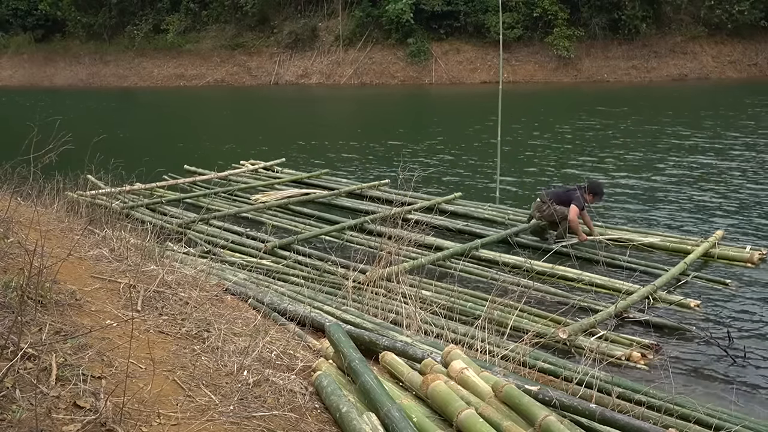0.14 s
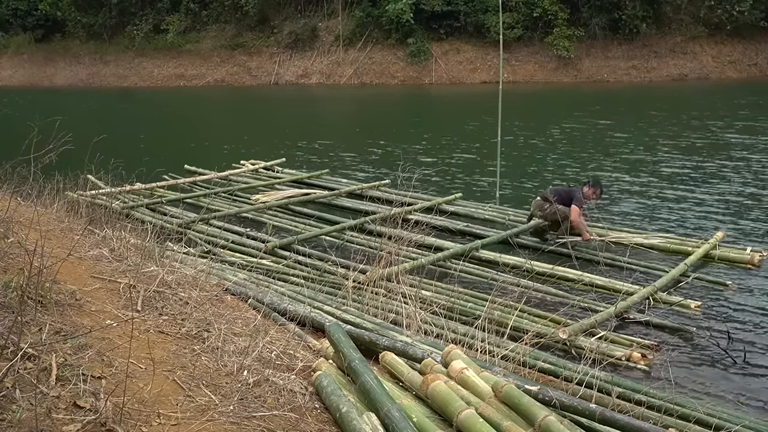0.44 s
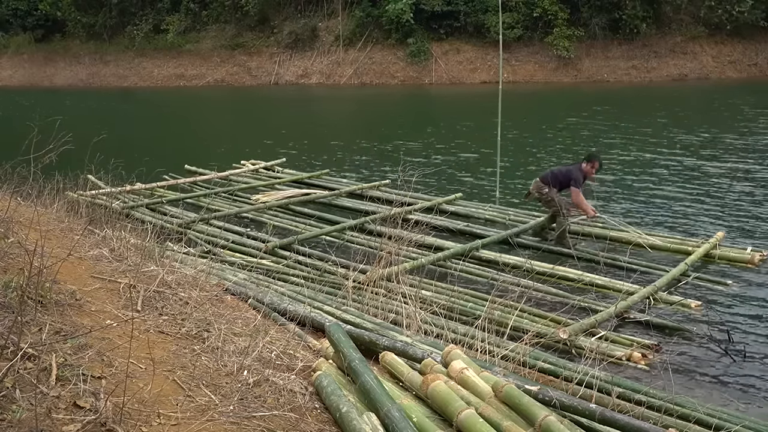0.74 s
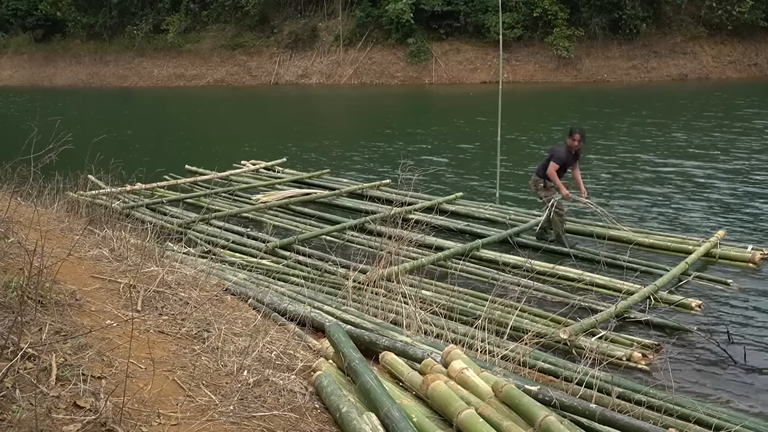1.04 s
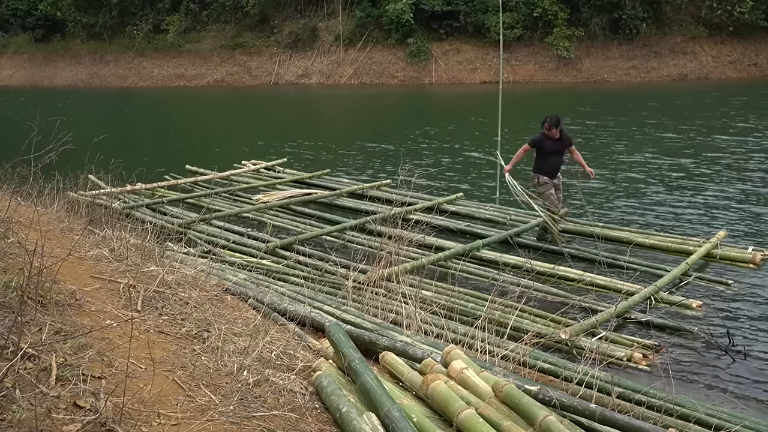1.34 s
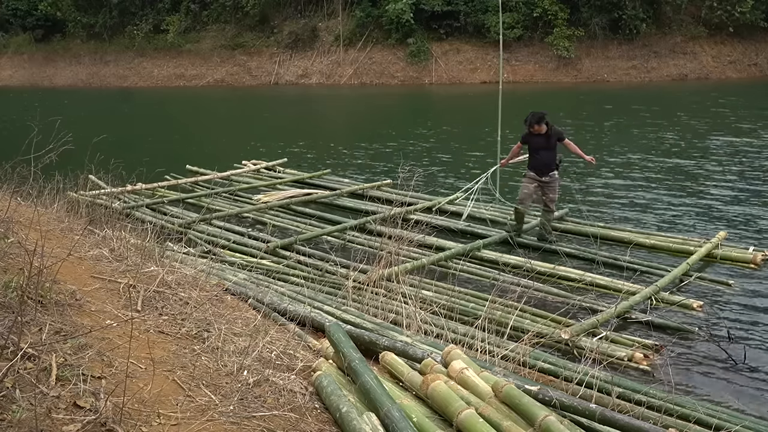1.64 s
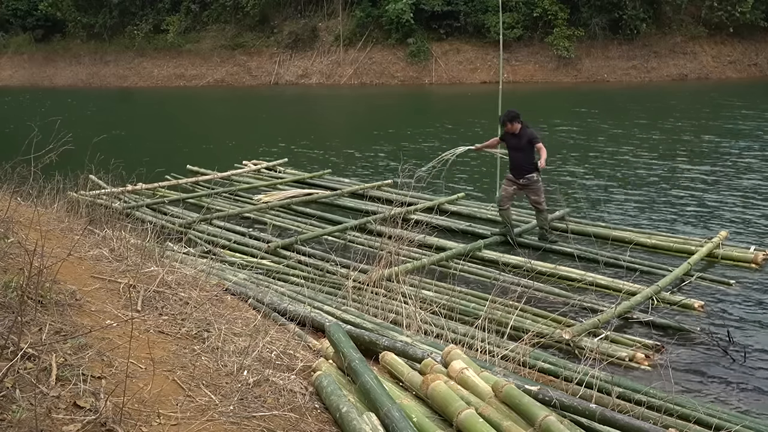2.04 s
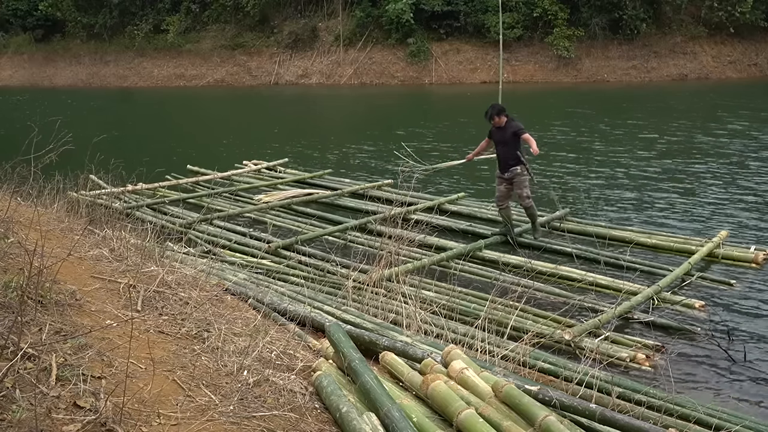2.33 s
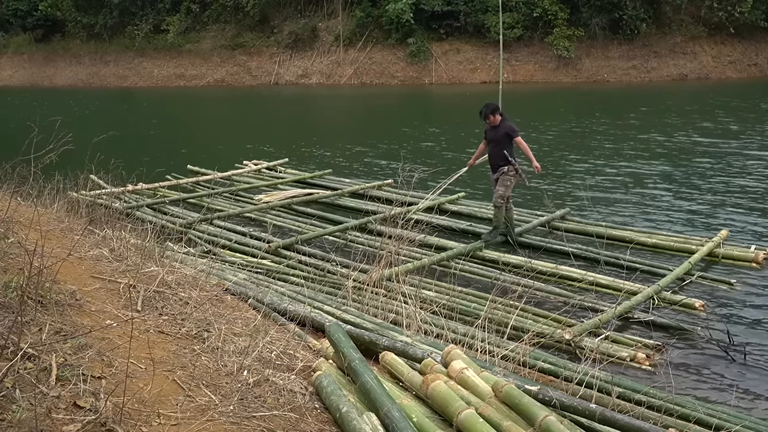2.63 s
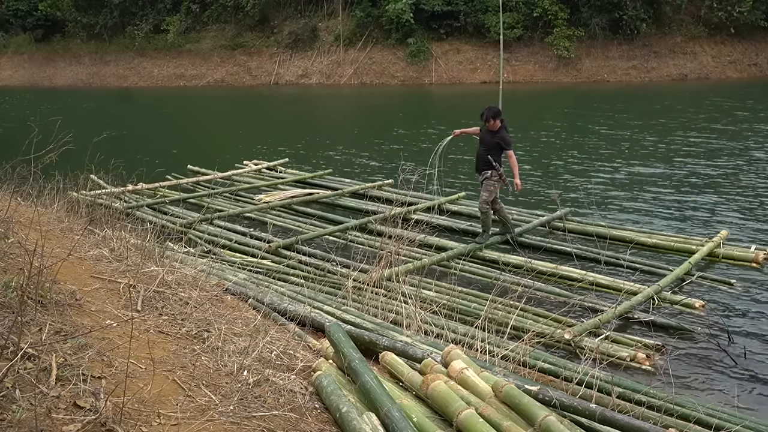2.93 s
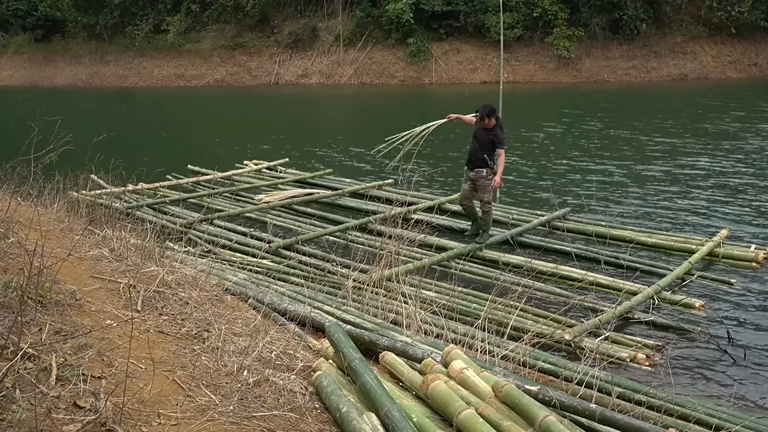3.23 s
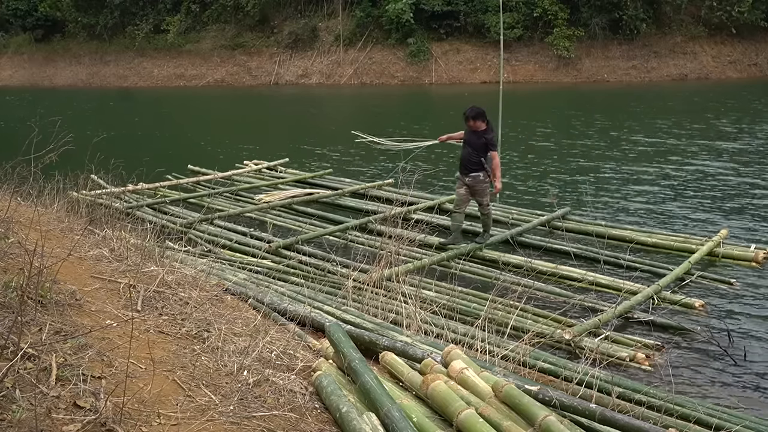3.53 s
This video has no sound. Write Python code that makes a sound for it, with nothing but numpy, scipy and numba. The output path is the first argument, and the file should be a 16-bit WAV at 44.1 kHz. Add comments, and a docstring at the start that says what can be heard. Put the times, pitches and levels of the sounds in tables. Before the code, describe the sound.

Footsteps on a floating bamboo raft, heard from a lake bank. Soft water hiss, fine crackle and low wind start at once, with light strip ticks. From about 0.4 s, short hollow knocks, creaks, scrapes and dull thuds come irregularly to the end, sharper near 1.5, 2.4 and 3.2 s. A dry crack snaps at 2.0 s. Wind booms on the microphone around 1.05 and 1.7-2.4 s, easing after 2.9 s.

```python
"""Wind rumble (slow noise), water hiss and fine crackle (noise bands) run from the start. Soon thin strips tick
(short noise bursts); then someone steps across a floating bamboo raft and each scuff swells with creaks,
thuds, scrapes and swish (many tiny contacts), as hollow poles knock (fading tones and rattle).
Gusts rumble on the microphone of a camera on the bank; its gain control turns all sound down when it is loud."""
import sys
import numpy as np
from scipy import signal
from scipy.io import wavfile
from scipy.ndimage import uniform_filter1d
from numba import njit

SR = 44100
rng = np.random.default_rng(int(sys.argv[2]) if len(sys.argv) > 2 else 0)


def inscribe(sig):
    """Save sig as 16-bit PCM at rate SR to the path in sys.argv[1].

    A 1-D sig is mono; a 2-D sig holds one channel per row.
    Samples are clipped to [-1, 1] before scaling.
    """
    pcm = np.round(np.clip(np.atleast_2d(sig).T, -1, 1) * 32767)
    wavfile.write(sys.argv[1], SR, pcm.astype(np.int16))


N = 163170  # length in samples

# Gusts. Each row: moment in seconds, level in dB, upper rumble in dB relative to the low rumble.
GUSTS = [(0, -26, 9.5), (.06, -46, -4), (.11, -24, -6), (.29, -15.5, -24), (.58, -16, -8),
         (.77, -16.5, -18.5), (.91, -22, -9), (1.05, -5.5, -14), (1.12, -15.5, -11.5), (1.36, -22, -4),
         (1.47, -16.5, -14.5), (1.52, -29.5, -45), (1.64, -22.5, 1.5), (1.74, -5.5, -7.5), (2.0, -7, -8.5),
         (2.3, -7.5, -10.5), (2.44, -20, -5.5), (2.59, -9.5, -9), (2.78, -11, -7), (2.95, -26.5, -30),
         (3.15, -32.5, -21), (3.26, -16.5, -14.5), (3.47, -31, -25), (3.7, -38.5, 5)]
# Low wind rumble. Each row: centre in Hz, width in Hz, level in dB.
LOW_RUMBLE = [(27.9, 21, -0.5), (43.4, 18.4, 2), (67.9, 32.8, -2.5)]
# Upper wind rumble. Each row: centre in Hz, width in Hz, level in dB.
HIGH_RUMBLE = [(102, 51, 2.5), (152, 76, -3), (232.6, 115, -14)]
# Water hiss. Each row: frequency in Hz, level in dB per Hz.
WATER_HISS = [(150, -39), (510, -3.5), (890, 2), (1420, -7), (3650, -5), (5350, -16.5), (8260, -31),
              (13200, -36), (16000, -61)]
# Cracks of thin strips. Each row: start in seconds, approximate peak in dB, centre in Hz,
# top end in dB relative to the main band, time to fade by 60 dB in seconds.
STRIP_TICKS = [(0.0488, -20, 2630, -13.5, 0.021), (0.1075, -25, 4360, -16, 0.017),
               (0.2883, -30, 4470, -24, 0.03), (0.425, -22.5, 3370, -3, 0.015),
               (0.4708, -33, 3500, 1, 0.014), (0.5464, -15, 2550, -35, 0.012),
               (0.6714, -23, 3450, -0.5, 0.025), (0.7309, -25, 3230, -19, 0.14),
               (0.8297, -26, 5000, -5, 0.012), (0.853, -12, 3030, -20, 0.072),
               (0.979, -29.5, 5670, 0, 0.032), (1.1638, -22, 3320, -27, 0.032),
               (1.2392, -28.5, 4760, -1, 0.027), (1.293, -24.5, 4800, -6.5, 0.1),
               (1.473, -11.5, 3650, -2, 0.019), (1.7043, -18.5, 4440, -9, 0.013),
               (1.714, -20.5, 4900, -8, 0.021), (1.914, -16, 3600, -8.5, 0.055),
               (1.96, -22.5, 5460, -14, 0.022), (2.0016, -5, 3000, -32, 0.017),
               (2.116, -16.5, 3160, -16, 0.022), (2.4683, -27, 3510, -5, 0.014),
               (2.5102, -17, 3330, -23, 0.023), (2.6332, -25.5, 3520, -12, 0.042),
               (2.9275, -21.5, 3400, -19.5, 0.053), (3.0633, -12, 1900, -41, 0.029),
               (3.172, -23, 5300, -10, 0.023), (3.2767, -17, 3600, -25, 0.012)]
# Scuffs of feet and strips. Each row: start in seconds, length in seconds,
# then the levels of creaks, thuds, scrape and swish in dB.
SCUFFS = [(0.384, 0.23, -27, -68, -32.5, -53), (0.54, 0.21, -32, -41, -33.5, -55),
          (0.679, 0.14, -46, -58, -34.5, -46), (0.948, 0.14, -31, -51, -38, -49.5),
          (1.142, 0.084, -50, -39, -33.5, -46), (1.226, 0.093, -40, -37.5, -39, -46.5),
          (1.31, 0.1, -37, -49, -34, -48.5), (1.42, .12, -32.5, -59, -28.5, -42),
          (1.63, 0.11, -31.5, -32, -32.5, -56), (1.812, 0.045, -31, -36, -37, -76),
          (2.196, 0.089, -27.5, -30.5, -37.5, -82), (2.361, 0.22, -29, -74, -35, -57),
          (2.565, 0.17, -46, -46, -36, -53), (2.719, 0.042, -26.5, -46, -50, -71),
          (2.785, 0.14, -31.5, -37.5, -35.5, -54), (3.057, 0.099, -34, -28, -37.5, -85),
          (3.13, 0.2, -27.5, -34, -37, -67), (3.391, 0.072, -30, -31.5, -41, -65),
          (3.59, 0.056, -39, -30, -40.5, -63), (3.634, 0.051, -45, -35.5, -31, -50.5)]
# Ways the whole raft rings. Each row: pitch in Hz, level in dB, time to fade by 60 dB in seconds.
RAFT_MODES = [(654, -7, 0.058), (809.5, -6, 0.1), (898.7, 2, 0.064), (1070, -1, 0.017), (1224, -0.5, 0.024),
              (1590, -3.5, 0.016)]
# Colour of scraping. Each row: centre in Hz, width in Hz, level in dB.
SCRAPE_BANDS = [(2030, 1960, 13), (3286, 550, 6.5), (4990, 1370, 7)]
# Colour of the thin swish. Each row: centre in Hz, width in Hz, level in dB.
SWISH_BANDS = [(11100, 3000, 1), (12900, 4600, -2.5)]
# Knocks on the poles. Each row: start in seconds, approximate peak in dB, pitch in Hz,
# ring time to fade by 60 dB in seconds.
POLE_KNOCKS = [(0.425, -22.5, 900, 0.042), (0.47, -18.5, 964, 0.03), (0.554, -13, 791, 0.057),
               (0.597, -21.5, 715, 0.038), (0.622, -16.5, 1525, 0.021), (0.703, -14.5, 748, 0.038),
               (0.732, -15, 905, 0.033), (0.852, -21, 810, 0.024), (1.014, -23, 1090, 0.031),
               (1.047, -12.5, 1130, 0.018), (1.108, -24, 880, 0.067), (1.25, -25.5, 530, 0.056),
               (1.333, -14.5, 1010, 0.011), (1.44, -22.5, 856, 0.25), (1.464, -4.5, 1000, 0.0082),
               (1.664, -16.5, 800, 0.013), (1.811, -21.5, 1100, 0.034), (1.842, -14.5, 890, 0.027),
               (2.053, -22.5, 760, 0.032), (2.218, -19, 580, 0.033), (2.385, -22, 1770, 0.02),
               (2.405, -9.5, 1098, 0.032), (2.471, -15, 1628, 0.032), (2.57, -20.5, 984, 0.025),
               (2.73, -20.5, 519, 0.051), (2.814, -13, 885, 0.041), (2.886, -17.5, 920, 0.046),
               (3.148, -25.5, 909, 0.067), (3.188, -16.5, 1754, 0.022), (3.241, -5, 1045, 0.014),
               (3.379, -14.5, 660, 0.041), (3.422, -20, 930, 0.016), (3.595, -25, 633, 0.042)]
# Tones of one hollow pole. Each row: multiple of its pitch, level in dB, share of its ring time.
POLE_TONES = [(1.004, 3, 1.33), (1.27, -10, 0.5), (1.9, -29, 0.16)]

BUFFET_DB, BUFFETS_PER_S, SHARED_BUFFET_DB = 1, 11, 2
SURGE_DB_PER_OCTAVE, SURGES_PER_S = 2.5, 26
LEFT_WIND_DB = 0.35  # wind on the left compared with the right
OPPOSITE_TREBLE_NOISE_DB = -82
LAKE_DB, FLICKER_DB, FLICKERS_PER_S = -36.5, 3, 9.55
CRACKLE_DB, CRACKLES_PER_S, CRACKLE_SCATTER_DB = -58, 100, 8.5
TICK_CREST_DB = 4.5  # allowance for a crack's peak above its average (rms) level
TICK_TOP_HZ, TICK_TOP_WIDTH_HZ = 11000, 9000
GRAIN_S, GRAIN_TOP_DB = 0.002, 8  # time for a grain's power to fall to 37 %; cap on the size boost
CREAKS_PER_S, CREAK_SCATTER_DB = 48, 5.5  # rate for each mode of the raft; thuds share the scatter
THUD_HZ, THUD_WIDTH_HZ, THUDS_PER_S = 342, 430, 440
SCRAPES_PER_S, SCRAPE_SCATTER_DB = 300, 3.5
SWISHES_PER_S, SWISH_SCATTER_DB = 93, 21
SCUFF_RISE = 0.41  # share of a scuff's length
CONTACT_S = 0.0012  # time for a pole's ring to rise
BLOW_T60_S = 0.069  # fade of the shake that each knock gives the raft
RAFT_DB, RATTLE_DB, RATTLE_SHARE = -10.5, -3, 1.73  # share: rattle fade over ring fade
KNEE_DB, RATIO, ATTACK_S, RELEASE_S = -16, 1.99, 0.037, 0.13
CEILING = 0.71  # full scale is 1
TOP_HZ = 16400


def undb(db):
    """Turn decibels into a plain factor."""
    return 10 ** (np.asarray(db) / 20)


def unit(x):
    """Scale a sound to an average (rms) level of 1."""
    return x / np.sqrt(np.mean(x ** 2))


def curve(table, col):
    """Draw straight lines through one column over time."""
    rows = np.array(table)
    return np.interp(np.arange(N) / SR, rows[:, 0], rows[:, col])


def band(x, hz, width, order=1):
    """Resonance with gain 1 at the centre; each extra pass makes it steeper."""
    sharpness = max(hz / width, 1 / 4)
    b, a = signal.iirpeak(min(hz, SR * 4 / 10), sharpness, fs=SR)
    for _ in range(order):
        x = signal.lfilter(b, a, x)
    return x


def noise_band(length, hz, width, order=2):
    """Fresh noise narrowed to one band, at average level 1."""
    return unit(band(rng.standard_normal(length), hz, width, order=order))


def bank(x, table, order=1):
    """Mix several bands of one sound at their listed levels."""
    return sum(undb(db) * unit(band(x, hz, width, order=order)) for hz, width, db in table)


def walk(rate):
    """Random levels held for 1 / rate seconds and smoothed twice; spread near 1."""
    hold = int(SR / rate)
    steps = rng.standard_normal(N // 256)[np.arange(N) // hold]
    smoother = uniform_filter1d(steps, hold)
    return unit(uniform_filter1d(smoother, hold))


def grains(rate, scatter_db):
    """Brief bursts of noise at random moments, some larger than others."""
    chance, luck = rng.random((N, 2)).T
    boost_db = np.minimum(-scatter_db * np.log(1 - luck), GRAIN_TOP_DB)
    starts = (chance < rate / SR) * undb(2 * boost_db)  # twice the dB, as this is power
    keep = np.exp(-1 / (GRAIN_S * SR))
    power = signal.lfilter([1], [1, -keep], starts)
    return np.sqrt(power) * rng.standard_normal(N)


def fade(t, t60):
    """Die away by 60 dB in t60 seconds, or in 2 ms if t60 is shorter."""
    return np.exp(-np.log(1000) * t / max(t60, 1 / 500))


def tone(t, hz, t60):
    """One ringing pitch that dies away."""
    return np.sin(2 * np.pi * hz * t) * fade(t, t60)


def add(out, s, x):
    """Mix a sound in at s seconds."""
    i = int(s * SR)
    out[i:i + len(x)] += x[:N - i]


def wind():
    """Buffeting low noise whose level comes in lumps; higher bands of the upper rumble swing more."""
    buffet = walk(BUFFETS_PER_S)
    low = 0
    for hz, width, db in LOW_RUMBLE:
        level_db = db + BUFFET_DB * walk(BUFFETS_PER_S)
        low = low + undb(level_db) * noise_band(N, hz, width)
    high = 0
    for hz, width, db in HIGH_RUMBLE:
        octaves = np.log2(hz / LOW_RUMBLE[1][0])  # above the second low band
        surge_db = SURGE_DB_PER_OCTAVE * octaves * walk(SURGES_PER_S)
        level_db = db + surge_db + BUFFET_DB * buffet
        high = high + undb(level_db) * noise_band(N, hz, width, order=3)
    rumble = unit(low) + undb(curve(GUSTS, 2)) * unit(high)
    shared = unit(undb(SHARED_BUFFET_DB * buffet))
    return shared * undb(curve(GUSTS, 1)) * rumble


def lake():
    """Water hiss made of noise bands half an octave apart, each flickering by itself."""
    rows, hiss = np.array(WATER_HISS), 0
    for hz in 250 * 2 ** np.arange(0, 6.1, 0.5):
        per_hz_db = np.interp(np.log(hz), np.log(rows[:, 0]), rows[:, 1])
        # A higher band is wider, so it holds more sound.
        level_db = per_hz_db + 10 * np.log10(hz) + FLICKER_DB * walk(FLICKERS_PER_S)
        hiss = hiss + undb(level_db) * noise_band(N, hz, hz / 2)
    return undb(LAKE_DB) * unit(hiss)


def crackle():
    """A fine crackle that runs throughout: random grains kept to the treble."""
    contacts = grains(CRACKLES_PER_S, CRACKLE_SCATTER_DB)
    return undb(CRACKLE_DB) * unit(bank(contacts, SCRAPE_BANDS[2:] + SWISH_BANDS, order=2))


def opposite_treble_noise():
    """Faint treble noise, to be added on the left and subtracted on the right."""
    return undb(OPPOSITE_TREBLE_NOISE_DB) * noise_band(N, 16000, 12000)


def ticks():
    """Thin strips crack on the poles: noise in a main band and a top band that fade together."""
    out, t = np.zeros(N), np.arange(SR // 12) / SR
    for s, db, hz, top_db, t60 in STRIP_TICKS:
        body = noise_band(len(t), hz, 0.75 * hz)
        top = noise_band(len(t), TICK_TOP_HZ, TICK_TOP_WIDTH_HZ)
        crack = (body + undb(top_db) * top) * fade(t, t60)
        add(out, s, undb(db - TICK_CREST_DB) * crack)
    return out


def creaks():
    """Small contacts at random moments; each wakes one mode of the raft, so the clatter wanders in pitch."""
    t, out = np.arange(SR // 10) / SR, 0
    for hz, db, t60 in RAFT_MODES:
        contacts = grains(CREAKS_PER_S, CREAK_SCATTER_DB)
        out = out + undb(db) * signal.fftconvolve(contacts, tone(t, hz, t60))[:N]
    return out


def shuffle():
    """Each scuff is a swell of small contacts: creaks in the raft, dull thuds, scrapes and a thin swish."""
    thud = band(grains(THUDS_PER_S, CREAK_SCATTER_DB), THUD_HZ, THUD_WIDTH_HZ, order=3)
    rub = grains(SCRAPES_PER_S, SCRAPE_SCATTER_DB)
    scrape = bank(rub, SCRAPE_BANDS, order=2)
    strips = unit(rub) + unit(grains(SWISHES_PER_S, SWISH_SCATTER_DB))
    swish = bank(strips, SWISH_BANDS, order=2)
    layers = np.array([unit(x) for x in (creaks(), thud, scrape, swish)])
    t, power = np.arange(N) / SR, 0
    for s, length, *db in SCUFFS:
        moments = s + length * np.array([0, SCUFF_RISE, 1, 1.3])
        # The small end values carry on outside the swell, as a faint constant trace.
        swell = np.interp(t, moments, [0.0014, 1.0, 0.14, 0.0014])
        power = power + undb(db)[:, None] ** 2 * swell
    return np.sum(np.sqrt(power) * layers, axis=0)


def raft(x):
    """The lashed poles ring together when shaken."""
    t = np.arange(SR // 5) / SR
    ring = sum(undb(db) * tone(t, hz, t60) for hz, db, t60 in RAFT_MODES)
    return signal.fftconvolve(x, ring / np.max(ring))[:N]


def knocks():
    """Each blow rings one hollow pole at its own pitch, rattles briefly and shakes the raft."""
    out, blows, t = np.zeros(N), np.zeros(N), np.arange(SR // 6) / SR
    for s, db, hz, t60 in POLE_KNOCKS:
        pole = sum(undb(tone_db) * tone(t, multiple * hz, share * t60)
                   for multiple, tone_db, share in POLE_TONES)
        pole = pole * np.minimum(t / CONTACT_S, 1)
        rattle = noise_band(len(t), 1.01 * hz, 0.39 * hz) * fade(t, RATTLE_SHARE * t60)
        shake = fade(t, BLOW_T60_S) * rng.standard_normal(len(t)) / 6
        add(out, s, undb(db) * (pole + undb(RATTLE_DB) * rattle))
        add(blows, s, undb(db) * shake)
    return out + undb(RAFT_DB) * raft(blows)


def scene():
    """Mix everything into left and right; only the wind balance and the opposite treble noise differ."""
    air = wind()
    rest = lake() + crackle() + ticks() + shuffle() + knocks()
    side = (undb(LEFT_WIND_DB / 2) - 1) * air + opposite_treble_noise()
    return np.array([air + rest + side, air + rest - side])


@njit
def follow(x, up, down):
    """Track loudness with a quick rise and a slower fall."""
    e, out = 0., np.empty(len(x))
    for i in range(len(x)):
        e += (x[i] - e) * (up if x[i] > e else down)
        out[i] = e
    return out


def record(dry):
    """Gain control ducks loud passages, a soft ceiling rounds peaks, and the top is cut."""
    loudness = follow(np.abs(dry).max(axis=0), 1 / (ATTACK_S * SR), 1 / (RELEASE_S * SR))
    below_knee = np.minimum(undb(KNEE_DB) / (loudness + 1e-9), 1)
    x = dry * below_knee ** (1 - 1 / max(RATIO, 1))
    x = x / (1 + np.abs(x / CEILING) ** 6) ** (1 / 6)
    top_cut = signal.ellip(10, 0.2, 70, TOP_HZ, fs=SR, output="sos")
    return signal.sosfilt(top_cut, x)


dry = scene()
out = record(dry)
inscribe(out)
```